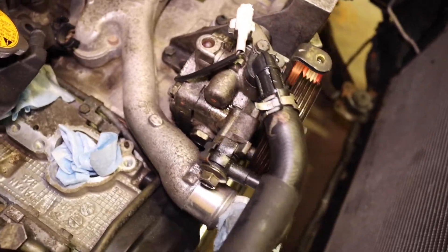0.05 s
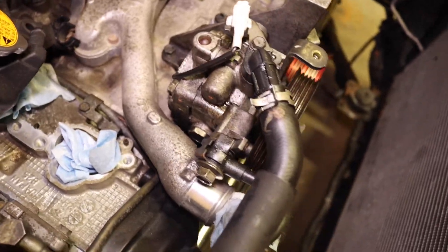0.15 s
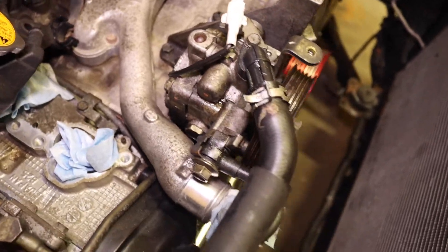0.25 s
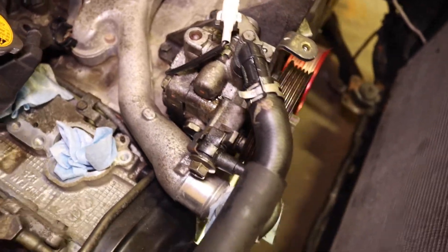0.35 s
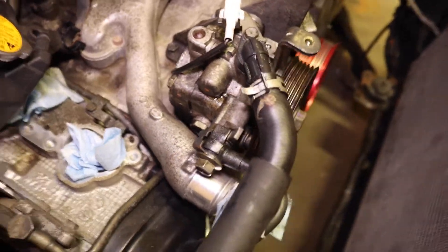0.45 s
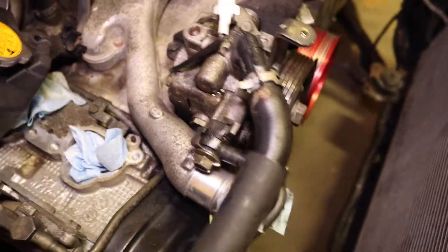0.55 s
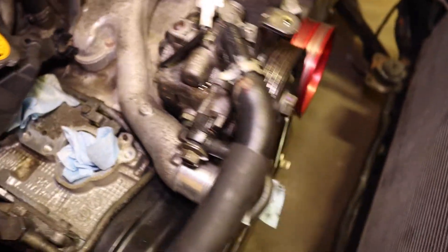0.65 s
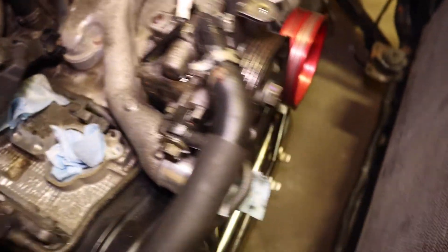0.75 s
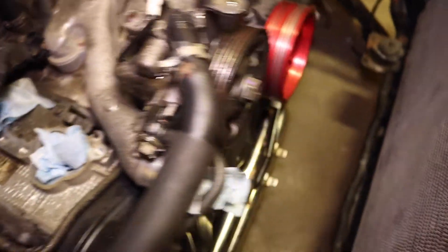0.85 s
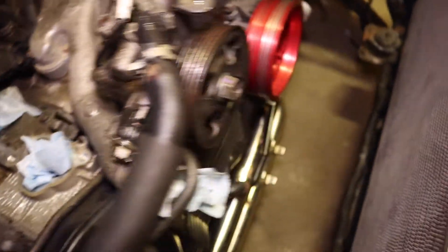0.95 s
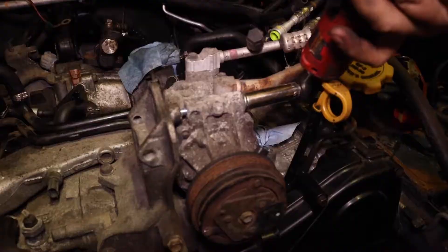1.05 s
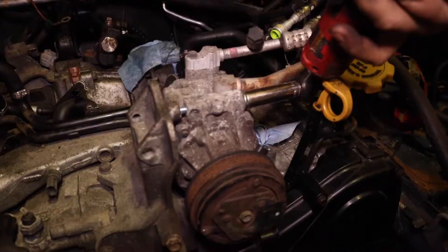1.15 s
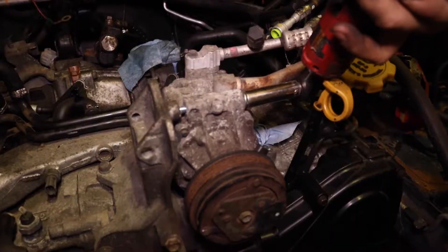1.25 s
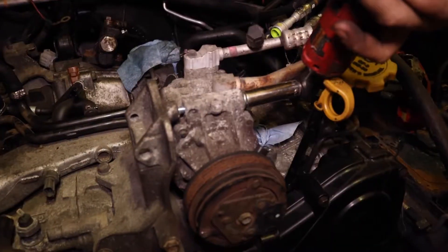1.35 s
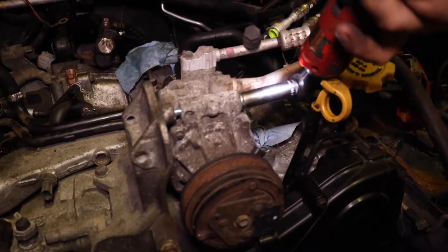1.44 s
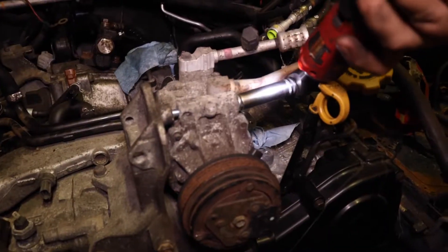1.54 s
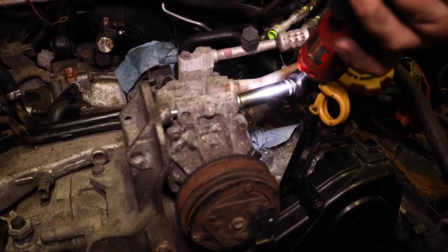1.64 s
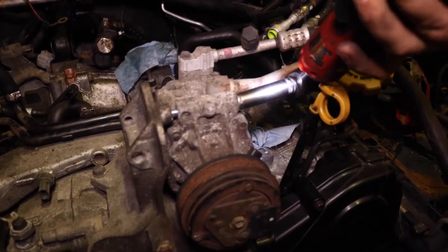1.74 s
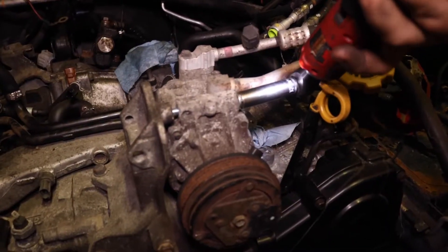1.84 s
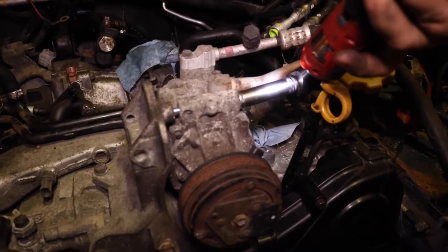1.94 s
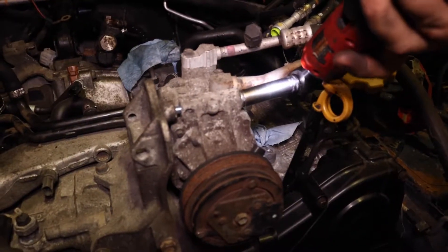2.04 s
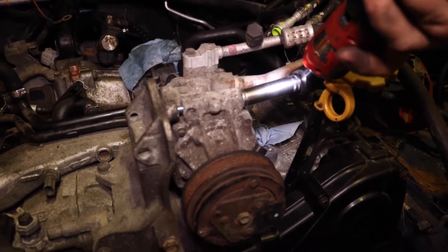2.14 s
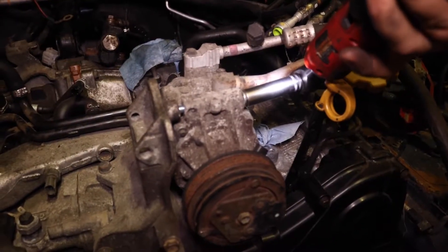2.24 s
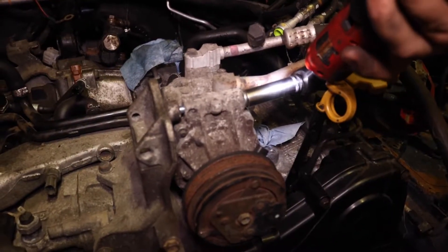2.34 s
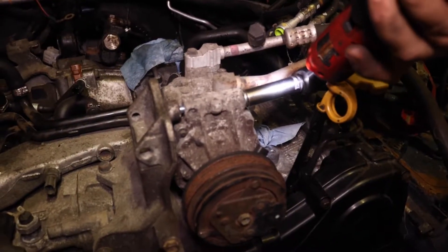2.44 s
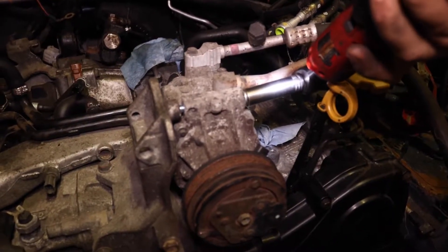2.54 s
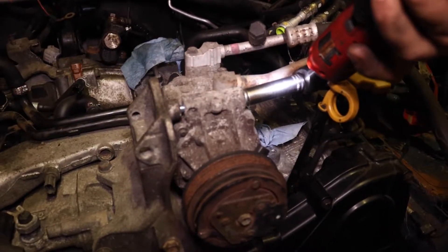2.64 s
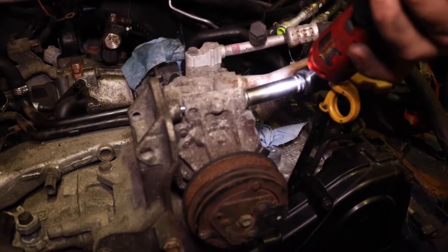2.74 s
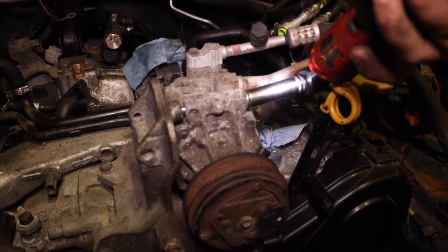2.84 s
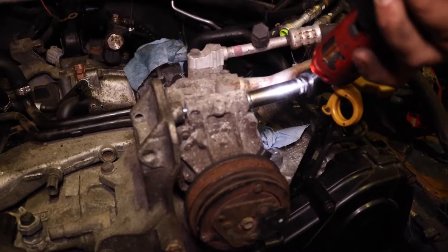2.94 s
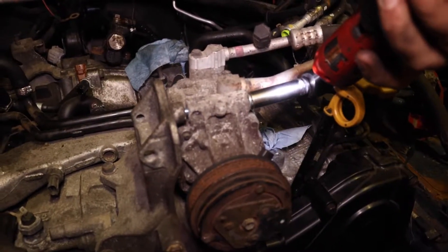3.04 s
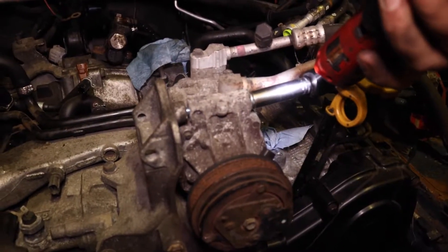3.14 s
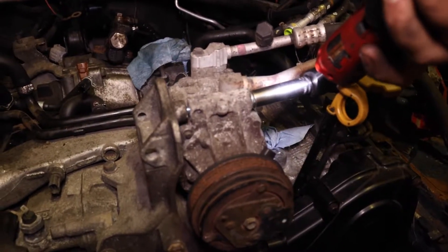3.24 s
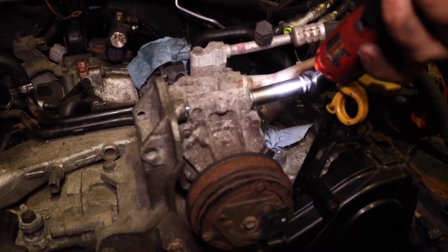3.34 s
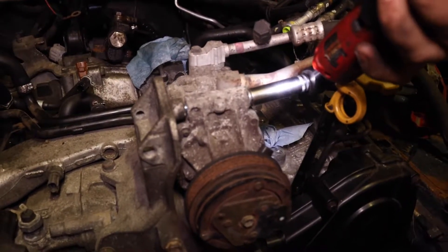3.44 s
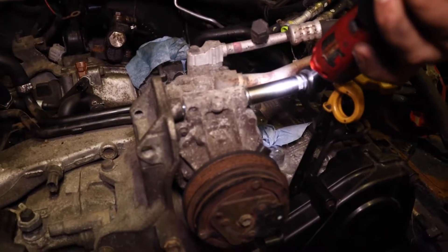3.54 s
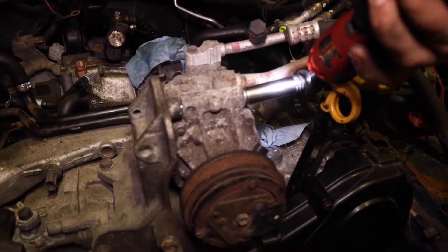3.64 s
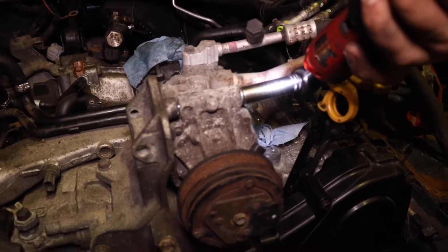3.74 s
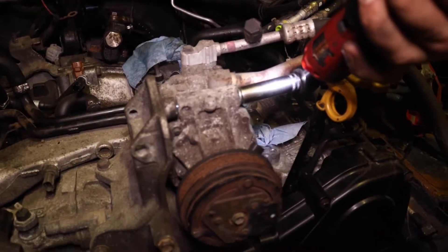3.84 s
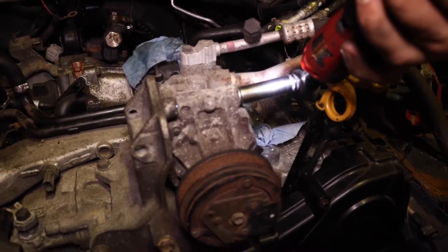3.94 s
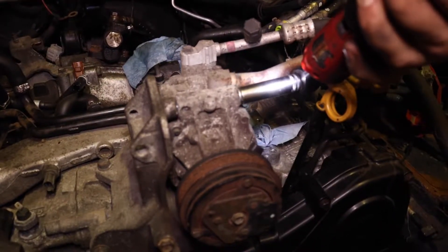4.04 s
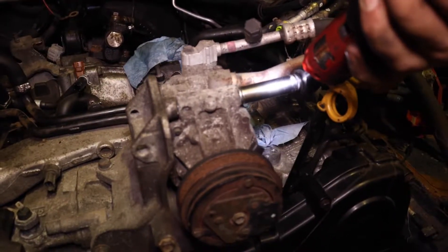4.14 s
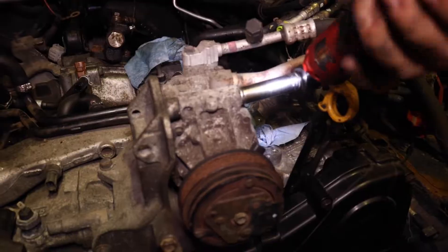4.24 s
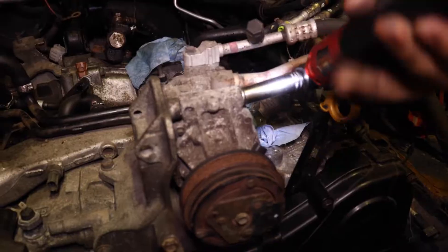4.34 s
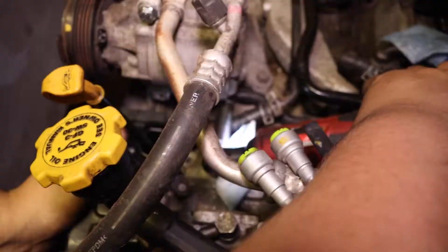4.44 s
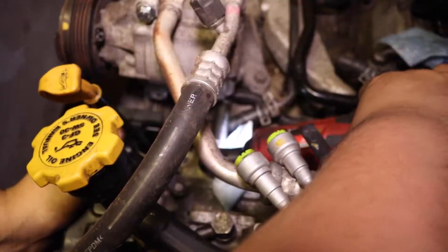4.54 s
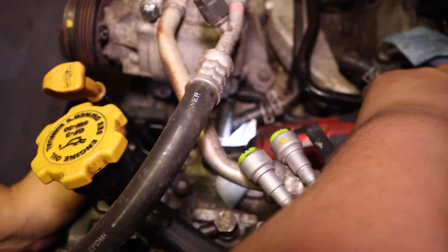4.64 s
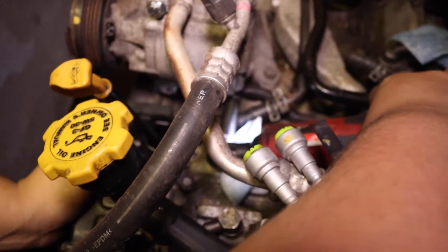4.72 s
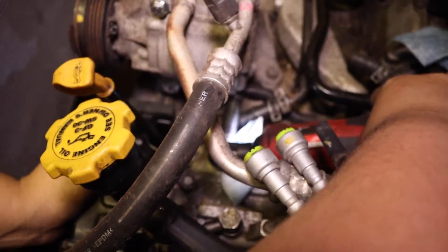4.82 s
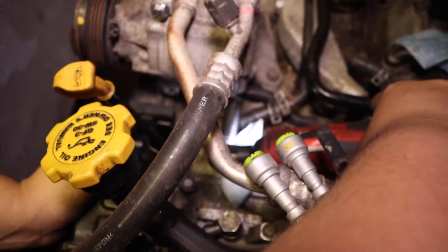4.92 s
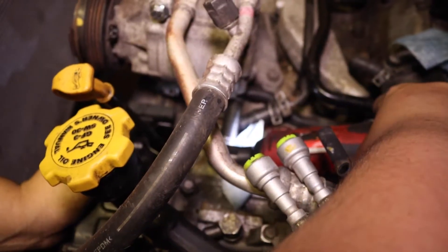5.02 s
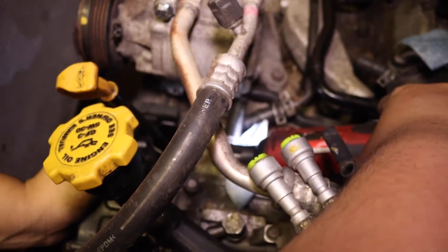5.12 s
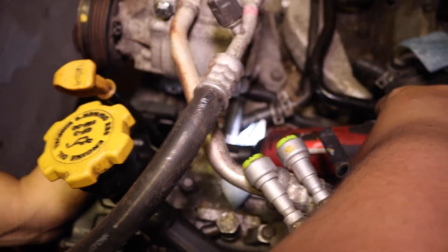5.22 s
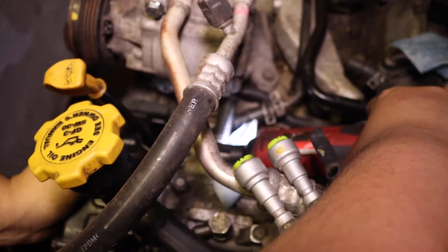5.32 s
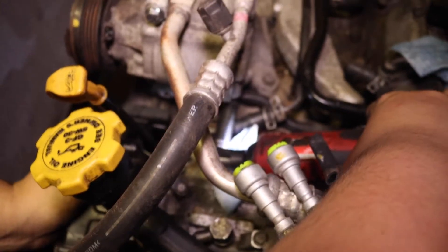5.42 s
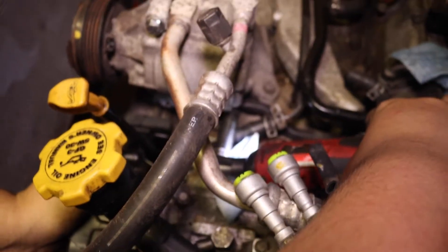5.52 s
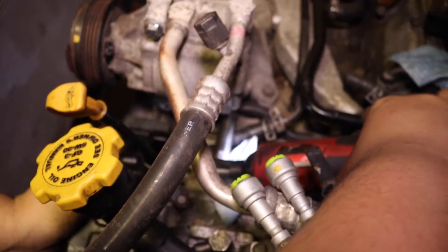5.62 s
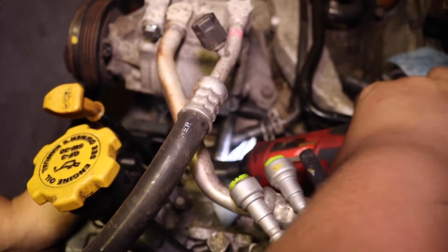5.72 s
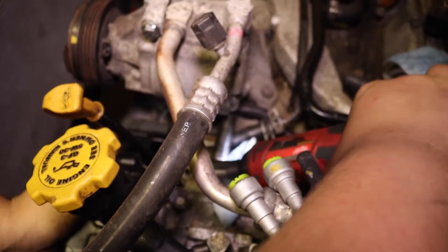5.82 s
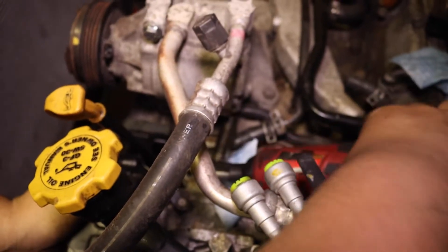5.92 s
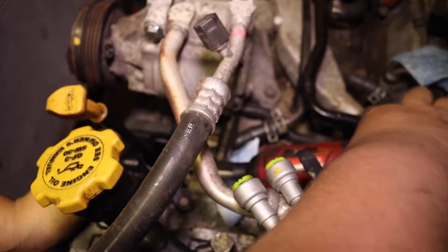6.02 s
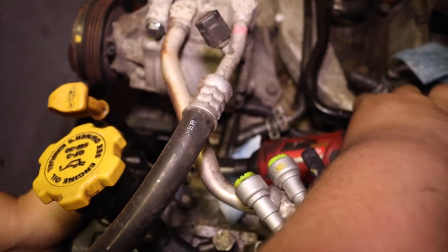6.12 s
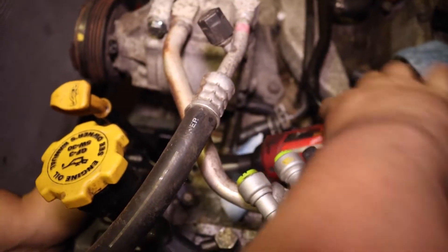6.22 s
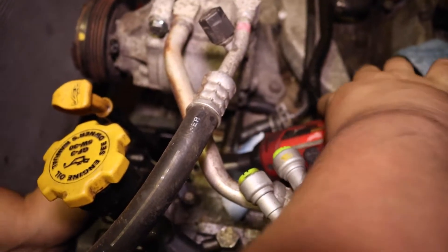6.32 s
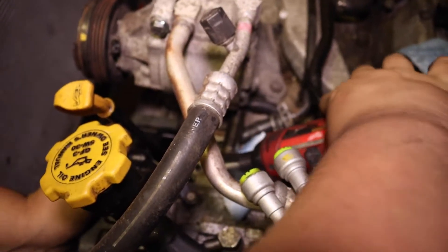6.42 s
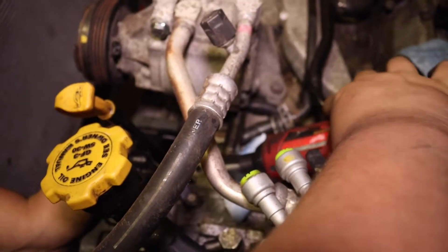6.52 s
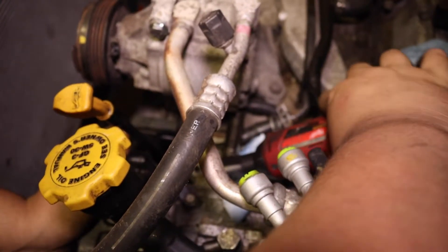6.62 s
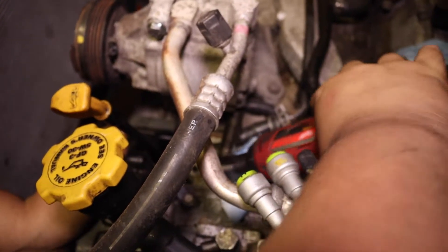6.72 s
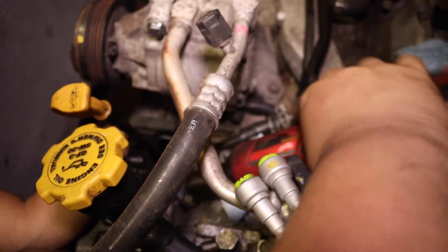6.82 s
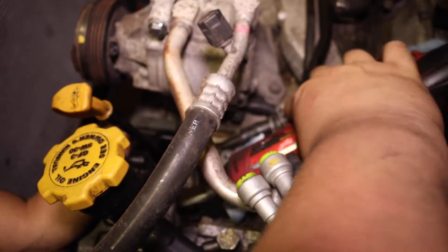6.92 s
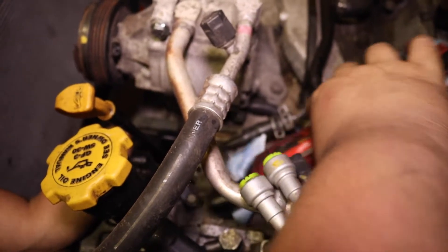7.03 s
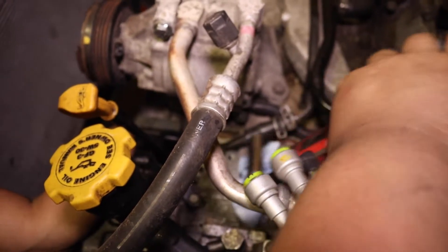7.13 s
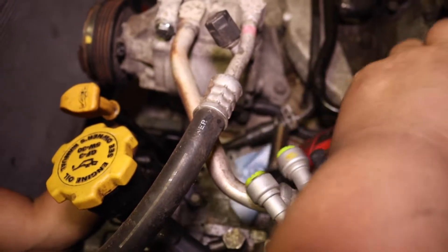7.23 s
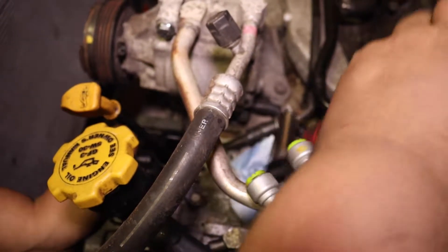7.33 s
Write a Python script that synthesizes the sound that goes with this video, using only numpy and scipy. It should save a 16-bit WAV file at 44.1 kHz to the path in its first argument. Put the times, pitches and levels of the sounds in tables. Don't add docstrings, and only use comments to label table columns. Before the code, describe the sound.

In a garage with low machine hum and faint insects, tools clank on steel across the room, getting harder. The sound cuts closer: a click, tiny ticks, then a cordless ratchet gives a short rattling burst that coasts down, followed at once by a long steady run. From another close position it runs again, stops, and after a quiet pause loose sockets click and snap sharply near the microphone.

```python
import sys
import numpy as np
from scipy import signal
from scipy.io import wavfile
from scipy.ndimage import map_coordinates

SR = 44100
rng = np.random.default_rng(int(sys.argv[2]) if len(sys.argv) > 2 else 0)


def master(y):
    cut = np.clip(np.atleast_2d(y).T, -1, 1)
    pcm = np.round(cut * 32767)
    wavfile.write(sys.argv[1], SR, pcm.astype(np.int16))


def magnitude_from_level(level_db):
    exponent = np.asarray(level_db, float) / 20
    return 10 ** exponent


N = 325035
T = np.arange(N) / SR


def rms_one(x):
    return x / np.sqrt(np.mean(x ** 2) + 1e-20)


def at_hz(points, hz):
    points_hz, level = np.transpose(points)
    return np.interp(np.log(hz), np.log(points_hz), level)


def clicks(times, gains):
    samples = np.round(np.asarray(times) * SR).astype(int)
    return np.bincount(np.minimum(samples, N - 1), gains, N) + 1e-12


def ring(x, hz, t60):
    r, w = magnitude_from_level(-60 / (t60 * SR)), 2 * np.pi * hz / SR
    return signal.lfilter([0, np.sin(w)], [1, -2 * r * np.cos(w), r * r], x)


def decay(x, t60):
    return signal.lfilter([1], [1, -magnitude_from_level(-60 / (t60 * SR))], x)


def high_pass(x, hz, order):
    return signal.sosfilt(signal.butter(order, hz, "high", fs=SR, output="sos"), x)


def band_pass(x, low_hz, high_hz, order):
    return signal.sosfilt(signal.butter(order, [low_hz, high_hz], "band", fs=SR, output="sos"), x)


def drift(rate):
    knots = rng.standard_normal(400)
    return map_coordinates(knots, [T * min(rate, 50)], order=3)


EDGES = 25 * 2 ** np.arange(0, 9.5, 1 / 3)


def bands(spectrum, envelope, size=N, low_hz=20):
    out, white = 0, rng.standard_normal((2, size))
    for k, (low, high) in enumerate(zip(EDGES, EDGES[1:])):
        if low > low_hz:
            hz = np.sqrt(low * high)
            out = out + magnitude_from_level(at_hz(spectrum, hz)) * band_pass(white[k % 2] * envelope(hz), low, high, 2)
    return out


# (from t/s, to t/s)
PLACES = [
    (0, 1.057),
    (1.068, 4.478),
    (4.478, 7.4),
]
AIR_DB = [-39, -36, -41.5]
# (from t/s, attack t/s, held until t/s, recovery t/s, level/dB)
DUCKS = [
    (1.49, 0.11, 1.66, 0.34, -24),
    (1.93, 0.083, 4.476, 0.003, -22),
    (4.68, 0.13, 6.4, .95, -13.5),
]


def gain_control():
    db = sum(level_db * (T >= start) * (T < stop) for (start, stop), level_db in zip(PLACES, AIR_DB))
    for start, attack_s, until, recovery_s, depth_db in DUCKS:
        corners = [start, start + attack_s, until, until + recovery_s]
        db = db + depth_db * np.interp(T, corners, [0, 1, 1, 0])
    return magnitude_from_level(db)


# (f/Hz, level/dB per Hz)
AIR = [
    [(12, -30), (20, -1.5), (158, -1), (254, -10), (524, -8), (819, -1.5), (1390, -17.5), (1600, -23),
     (3400, -37.5), (3800, -27), (5320, -25), (5950, -34.5), (15800, -40)],
    [(12, -39), (20, 3.5), (76, -4), (137, -2.5), (221, -0.5), (554, -7.5), (866, -2), (1950, -33.5),
     (3130, -33.5), (4370, -27), (5950, -44.5), (6650, -39), (15800, -46)],
    [(12, -28), (20, 7), (65, -15.5), (123, -2), (209, -14.5), (554, -10), (754, -10), (866, -6.5),
     (1560, -22), (3400, -30), (5170, -26.5), (5780, -35), (15800, -39.5)],
]


def room_air(place):
    flicker = magnitude_from_level(0.72 * drift(4.5))
    return rms_one(bands(AIR[place], lambda hz: flicker))


# (multiple of 69 Hz, level/dB)
HUM = [(1, -38.5), (2, -30), (3, -31.5), (4, -46.5), (5, -40.5), (6, -48.5), (7, -46), (10, -49.5)]


def hum():
    out = 0
    for k, db in HUM:
        level = magnitude_from_level(db + 0.49 * drift(6.0))
        out = out + level * np.sin(2 * np.pi * k * 69 * T + .2 * drift(18.0))
    return rms_one(out)


# (t/s, level/dB)
INSECTS = [(0, -29), (.12, -37), (.2, -33), (1.2, -32.5), (1.3, -27), (6.2, -27.5), (6.4, -22.5),
           (6.9, -18.5), (7.37, -34)]


def insects():
    trill = rng.standard_normal(N) * magnitude_from_level(3.7 * drift(50))
    song = ring(trill, 5400, 0.015) + magnitude_from_level(-3.0) * ring(trill, 7300, 0.025)
    return magnitude_from_level(np.interp(T, *np.transpose(INSECTS))) * rms_one(song)


# (f/Hz, t60/s)
GARAGE_T60 = [(300, 0.55), (1500, 0.72), (5000, 0.45), (12000, 0.057)]


def garage(x):
    s, out = T[:SR], 0

    def fade(hz):
        return magnitude_from_level(-60 * s / at_hz(GARAGE_T60, hz)) * (s > .004)

    shares = np.array([drift(14) for _ in range(3)])
    for share in shares / np.linalg.norm(shares, axis=0):
        tail = bands([(100, 0.0069), (16000, 0.0059)], fade, size=SR, low_hz=150)
        out = out + share * signal.oaconvolve(x, tail / np.linalg.norm(tail))[:N]
    return out


# (t/s, peak level/dB, bright part level/dB, struck region f/Hz)
CLANKS = [
    (0.074, -60.5, -53.5, 3500),
    (0.1186, -29, -81, 3900),
    (0.1885, -20.5, -47.5, 3000),
    (0.316, -19, -59.5, 3430),
    (0.3359, -11, -50.5, 3800),
    (0.597, -14, -54, 3800),
    (0.897, -6.5, -47, 3300),
]
# (f/Hz, t60/s, level/dB)
CLANK_MODES = [(2070, 0.0018, 7.5), (2900, 0.011, -5.5), (3360, 0.0066, -3), (3900, 0.0098, -4),
               (4600, 0.004, -11), (5490, 0.0056, 2), (6350, 0.01, -5.5)]
# (f/Hz, t60/s, level/dB)
CLANK_BRIGHT = [(9150, 0.0055, -15.5), (10030, 0.0079, -6), (9900, 0.0033, -9)]


def clanks():
    s, db, bright_db, struck_hz = np.transpose(CLANKS)
    out = 0
    for modes, level_db, t60 in ((CLANK_MODES, db - 34.5, .12), (CLANK_BRIGHT, bright_db - 5.0, .3)):
        for hz, ring_t60, mode_db in modes:
            far_db = 10.5 * abs(np.log2(hz / struck_hz)) * (hz < 8000)
            hits = clicks(s, magnitude_from_level(level_db + mode_db - far_db))
            out = out + ring(rng.standard_normal(N) * decay(hits, t60), hz, ring_t60)
    burst = rng.standard_normal(N) * decay(clicks(s, magnitude_from_level(db - 27)), 0.054)
    out = out + band_pass(burst, 1500, 9000, 2)
    return out + magnitude_from_level(-3.5) * garage(out)


# (t/s, f/Hz, level/dB, t60/s)
PINGS = [(4.437, 2300, -31, 0.084), (5.736, 14000, -23, .008), (5.759, 13130, -21.5, .008),
         (5.866, 12800, -19, 0.012), (6.036, 10600, -49, 0.049), (7.002, 840, -26.5, 0.13),
         (7.001, 1770, -21, 0.055), (7.002, 7400, -18.5, 0.014), (5.875, 2070, -13.5, 0.012),
         (7.1574, 3580, -5.5, 0.012), (0.598, 3950, -39, .08), (0.898, 5650, -38, .06),
         (7.218, 3200, -15.5, 0.017), (7.2554, 3100, -16, .022), (7.318, 3000, -21, .025)]


def pings():
    out = 0
    for s, hz, db, t60 in PINGS:
        struck = ring(clicks([s], magnitude_from_level([db - 13.5])), hz, t60)
        out = out + ring(struck, hz, 0.0019)
    return out


# (t/s, peak level/dB, ring
# f/Hz, top level/dB, bottom level/dB)
CLICKS = [(1.07, -29.5, 2000, -2.5, 1), (1.261, -24, 2400, -7.5, -9), (4.541, -22, 2560, -25, -3),
          (4.553, -22, 2960, -3, -14), (4.6326, -35, 3400, -23.5, 10.5), (5.7815, -20, 2800, 16, -22),
          (5.8542, -24, 4000, 18.5, -30), (6.339, -38.5, 3620, 4, -15), (6.8371, -19, 4040, -13.5, -33),
          (6.872, -21, 3180, -1.5, -21), (7.0, -2.5, 3020, -5, -6.5), (7.0804, -10.5, 3770, -7, -28),
          (7.1568, -3.5, 3930, -4, -39), (7.219, -11, 3260, -11, -11.5), (7.2523, -10, 3480, 1, -37),
          (7.308, -24, 2840, -5.5, -17), (7.316, -10.5, 3300, -2, -5.5)]
# (t/s, peak level/dB, ring f/Hz)
TOUCHES = [(1.1951, -28.5, 3160), (1.380, -29.5, 2970), (6.2569, -42, 3648), (6.3636, -47, 3300),
           (6.501, -63, 3070), (6.5438, -32, 3196), (6.608, -44, 2750), (6.6943, -40, 2720),
           (6.9447, -29.5, 2780), (7.1885, -20.5, 2900)]
# (t/s, peak level/dB, ring f/Hz)
RATTLES = [(6.7962, -25, 4000), (6.8031, -14, 3360), (6.8445, -13.5, 3000), (6.85, -16, 2290),
           (7.0876, -6, 3600), (7.2557, -6, 3300), (7.275, -26, 3680), (7.3207, -9.5, 3060),
           (7.34, -18.5, 4493)]


def handling():
    out, s = np.zeros(N + 3000), T[:3000]
    # t60 s, broad dB
    rows = [row + (.02, -5.0) for row in CLICKS]
    rows += [row + (-8, -12.5, .02, -9) for row in TOUCHES]
    rows += [row + (-26, -18, .011, -9) for row in RATTLES]
    noises = rng.standard_normal((len(rows), 3000))
    for (start, db, hz, top_db, bottom_db, t60, broad_db), noise in zip(rows, noises):
        scuff = noise * (magnitude_from_level(-60 * s / t60) + magnitude_from_level(-18.0 - 60 * s / 0.15))
        sound = magnitude_from_level(-32.5) * ring(ring(scuff, hz, 0.0024), hz, 0.0024)
        sound += magnitude_from_level(broad_db) * band_pass(scuff, 1000, 7000, 3)
        sound += magnitude_from_level(top_db - 10.0) * band_pass(scuff, 5500, 15500, 2)
        sound += magnitude_from_level(bottom_db - 17.0) * ring(scuff, 1000, 0.009)
        sound += magnitude_from_level(bottom_db - 36.5) * ring(scuff, 600, 0.016)
        i = round(start * SR)
        out[i:i + 3000] += magnitude_from_level(db) * sound
    return out[:N]


def lens():
    at = 1.093 + .0612 * np.arange(6)
    ticks, echo_s = 0, .00037
    for k, sign in enumerate([1, -1, 1, -1]):
        ticks = ticks + sign * clicks(at + k * echo_s, magnitude_from_level(-27 - 1.9 * k) * np.ones(6))
    return signal.lfilter([.25, .5, .25], [1], ticks)


# (from t/s, to t/s, level/dB, second harmonic level/dB)
WHINE = [
    (1.449, 1.468, -60, 25),
    (1.87, 1.895, -58, 0),
    (4.602, 4.624, -40, 0),
    (4.624, 4.652, -38, 0),
]
# (multiple of 1862 Hz, level/dB)
WHINE_ORDERS = [(1, -5), (2, -8), (3, 0), (4, -18), (5, -19), (6, -26), (7, -22)]


def whine():
    level, even_db = 0, 0
    for a, b, db, second_db in WHINE:
        during = (T > a) * (T < b)
        level = level + magnitude_from_level(db) * np.interp(T, [a, a + 0.0021, b - .006, b], [0.34, 1, 1.0, 0.3]) * during
        even_db = even_db + second_db * during
    tones = sum(magnitude_from_level(db + even_db * (k == 2)) * np.sin(2 * np.pi * k * 1862 * T) for k, db in WHINE_ORDERS)
    return level * tones


# (t/s, strokes made so far)
STROKES = [
    [(1.4656, 0), (1.4874, 2), (1.516, 4), (1.5354, 5), (1.5674, 7), (1.6104, 10), (1.6514, 13),
     (1.6664, 14)],
    [(1.8951, 0), (1.9138, 1), (1.9445, 3), (1.993, 5.9), (2.102, 13.43), (2.321, 29.33), (2.539, 44.89),
     (2.757, 60.42), (2.976, 76.36), (3.085, 84.14), (3.194, 91.74), (3.303, 99.56), (3.522, 115.6),
     (3.74, 131.31), (3.958, 147.36), (4.068, 155.33), (4.177, 163.16), (4.3159, 173)],
    [(4.646, 0), (4.6709, 2), (4.6913, 3), (4.721, 5), (4.751, 7.06), (4.893, 17.96), (4.964, 23.3),
     (5.106, 34.45), (5.249, 45.32), (5.32, 50.95), (5.462, 61.89), (5.675, 78.11), (5.705, 80)],
]
# (time constant t/s, strokes of momentum left, strokes made)
COAST = [(.125, 8.93, 6), (.125, 8.5, 5), (.09, 6, 4)]
# (t/s, share of a 13.8 ms stroke)
SLIP = [
    [(1.46, 0), (1.7, 0)],
    [(1.92, .03), (1.96, .1), (2.1, .07), (2.25, 0), (2.4, -.06), (2.58, -.06), (2.66, .02), (2.85, .02),
     (3.05, .05), (3.15, .01), (3.3, .05), (3.45, 0), (3.62, -.11), (3.75, 0), (3.9, .12), (4.05, .02),
     (4.2, -.03), (4.3, .02)],
    [(4.72, -.03), (4.83, .07), (4.95, -.03), (5.05, -.03), (5.1, .02), (5.3, .05), (5.45, .02),
     (5.6, -.03), (5.7, -.03)],
]


def stroke_times(run):
    s, made = np.transpose(STROKES[run])
    lag_s, left, count = COAST[run]
    driven = np.interp(np.arange(made[-1] + 1), made, s)
    driven = driven + .0138 * np.interp(driven, *np.transpose(SLIP[run]))
    coasting = s[-1] - lag_s * np.log(1 - np.arange(1, count + 1) / left)
    return np.r_[driven, coasting]


KNOCK_PAWL_DB = [9.5, 3.5, -8.5]
PAWL_FADE_DB_PER_S = [900, 2500, 250]
# (delay t/s, level/dB)
REBOUNDS = [
    (.0028, -6.5),
    (.0055, -15),
]


def contacts(run, pawl, at, blow_db, last_turn):
    gap, count = np.diff(at), len(at) - 1
    when, hit_db = [at - .0008 + rng.normal(0, .0002, len(at))], [blow_db]
    knock_tick_db = blow_db[:-1] + KNOCK_PAWL_DB[run] + 2.5 * rng.standard_normal(count)
    ticks = clicks(at[:-1] + 0.00018, magnitude_from_level(knock_tick_db))
    engaged_db = blow_db[:-1] - 40 * ((gap > .033) | (at[1:] > last_turn))
    fade_db = PAWL_FADE_DB_PER_S[run] * np.maximum(gap - .015, 0)
    for share, ring_db, head_db in pawl:
        when.append(at[:-1] + gap * (share + 0.029 * rng.standard_normal(count)))
        hit_db.append(engaged_db + head_db)
        seat_db = 2.2 * rng.standard_normal(count) + 1.5 * np.interp(at[:-1], T, drift(3.0))
        ticks = ticks + clicks(when[-1], magnitude_from_level(engaged_db + ring_db + seat_db - fade_db))
    slow = np.diff(at, prepend=at[0]) > .0165
    for delay_s, rebound_db in REBOUNDS:
        when.append(at[slow] + delay_s)
        hit_db.append(blow_db[slow] + rebound_db)
    heavy = np.r_[slow, np.zeros(len(pawl) * count), np.ones(len(REBOUNDS) * slow.sum())]
    return np.concatenate(when), np.concatenate(hit_db), heavy, ticks


SLOW_DULL_DB_PER_OCTAVE = [3, -1, 5.5]


def head_noise(run, head, when, hit_db, heavy, rasp_db):
    grains = magnitude_from_level(4.0 * np.minimum(rng.exponential(1, N), 4)) * (rng.random(N) < 6000 / SR)
    teeth = magnitude_from_level(rasp_db) * rms_one(grains)

    def contact(hz):
        dull_db = heavy * SLOW_DULL_DB_PER_OCTAVE[run] * max(np.log2(hz / 4000), 0)
        blows = clicks(when, magnitude_from_level(hit_db - dull_db + 1.6 * rng.standard_normal(len(when))))
        fall, rise = .004 + 18 / hz, .0015 + 5 / hz
        onset = fall * rise / (fall + rise)
        return magnitude_from_level(25) * (decay(blows, fall) - decay(blows, onset)) + teeth

    return magnitude_from_level(2.0) * bands(head, contact, low_hz=995)


SOCKET_WOBBLE = [.02, .025, .006]


def socket_ring(run, socket, when, hit_db):
    out = 0
    for turn, (hz, t60, db) in enumerate(socket):
        struck = clicks(when, magnitude_from_level(hit_db + 2.0 * rng.standard_normal(len(when))))
        tilt = np.clip(np.round(drift(9)), -1, 1)
        modes = 0
        for k in (-1, 0, 1):
            modes = modes + ring(struck * (tilt == k) + 1e-12, hz * (1 + SOCKET_WOBBLE[run] * k), t60)
        out = out + (-1) ** turn * magnitude_from_level(db - 13.5) * ring(modes, hz, .003)
    return out


PAWL_HZ = [12600, 12300, 12300]


def pawl_ring(run, ticks):
    out, seating = 0, rng.integers(0, 3, N)
    for k, tune in enumerate([.9, 1, 1.05]):
        hz = PAWL_HZ[run] * tune
        out = out + magnitude_from_level(-11) * ring(ring(ticks * (seating == k) + 1e-12, hz, .002), hz, .001)
    return out


# (rocks per s, depth level/dB, firmest grip t/s)
ROCKING = [(2.27, 0, 1.6), (2.27, 1.5, 2.61), (7.25, 2.5, 5.178)]
# (from t/s, to t/s, level/dB)
LEANS = [
    (1.459, 1.58, 2.5),
    (1.913, 2.019, 12),
    (3.66, 3.948, 10),
    (4.115, 4.44, 5.5),
    (4.63, 4.74, 7.5),
    (5.652, 5.95, 19),
]
LOW_BOOM_DB = [-16.5, -17.5, -19]
HOUSING_WANDER_S = [.0002, .00018, .0004]


def housing_boom(run, housing, at, boom_db):
    shake = magnitude_from_level(-33 + np.interp(T, at, boom_db)) * rng.standard_normal(N) * (T > at[0]) * (T < at[-1])
    rate, depth_db, firm_s = ROCKING[run]
    hand_db = depth_db * np.cos(2 * np.pi * rate * (at - firm_s))
    low_db = LOW_BOOM_DB[run]
    for a, b, db in LEANS:
        low_db = low_db + db * np.interp(T, [a, a + 0.048, b - .06, b], [0, 1, 1, 0])
    body, late = 0, at + .0011 + HOUSING_WANDER_S[run] * np.interp(at, T, drift(11))
    for hz, t60, db in housing:
        chance_db = 1.5 * rng.standard_normal(len(at)) + 1.5 * np.interp(at, T, drift(12))
        push = clicks(late, magnitude_from_level(boom_db + hand_db + chance_db)) + shake
        mode = ring(push * magnitude_from_level((low_db + 6.0 * drift(4.88)) * (hz < 600)), hz, t60)
        body = body + magnitude_from_level(db + 7.0) * high_pass(mode, 0.5 * hz, order=2)
    if run == 2:
        body = body + magnitude_from_level(14) * ring(push * (T > STROKES[run][-2][0] - .03), 895, 0.05)
    return body


# (t/s, knock level/dB, gear rasp level/dB, grip on the housing level/dB)
LOAD = [
    [(1.45, -40, -54.5, -45), (1.465, -26, -27, -43), (1.477, -11, -33, -23.5), (1.501, -9.5, -14, -17.5),
     (1.517, -6.5, -3.5, -20), (1.549, -11, -3.5, -21), (1.58, -10.5, -8.5, -21.5), (1.606, -11.5, -9, -24),
     (1.63, -14.5, -6.5, -25.5), (1.74, -19.5, -19, -28), (1.803, -17.5, -24.5, -28.5),
     (1.892, -24.5, -33.5, -32)],
    [(1.895, -18, -22, -37.5), (1.914, -9.5, -26.5, -22.5), (1.945, -9, -4.5, -15), (2.0, -11, -1.5, -23),
     (2.15, -14.5, -7, -29), (2.4, -18.5, -8, -25), (2.62, -18, -8.5, -28.5), (2.72, -17, -13.5, -33),
     (2.78, -19, -10, -27), (2.95, -19.5, -9.5, -28.5), (3.07, -17, -10, -30.5), (3.3, -16.5, -11.5, -30.5),
     (3.5, -19.5, -8.5, -32), (3.9, -18.5, -11.5, -34), (4.24, -17, -10.5, -32.5),
     (4.33, -17.5, -14.5, -38), (4.45, -25.5, -51.5, -45)],
    [(4.625, -38, -19.5, -34.5), (4.657, -13, -16, -27.5), (4.672, -6, -11.5, -14.5), (4.696, -14, -3, -26),
     (4.765, -13, -6.5, -25.5), (4.9, -17.5, -11, -33), (5.04, -18.5, -6.5, -30),
     (5.18, -18.5, -9.5, -29.5), (5.33, -19, -15.5, -32.5), (5.45, -19.5, -5.5, -30),
     (5.68, -17, -15, -32.5), (5.8, -10.5, -28, -32.5), (5.83, -29, -54.5, -10)],
]
# (t/s, knock level/dB, housing level/dB)
SETTLE = [
    [(1.8323, -23, -33)],
    [(4.455, -32, -69), (4.4754, -50, -62)],
    [(5.8536, -25.5, -66), (5.8742, -13.5, -34.5)],
]


def ratchet(run, head, housing, socket, pawl):
    s, knock_db, rasp_db, grip_db = np.transpose(LOAD[run])
    turning = stroke_times(run)
    rest_s, rest_db, rest_grip_db = np.transpose(SETTLE[run])
    backlash_db = .9 * rng.standard_normal(len(turning)) + 1.2 * np.interp(turning, T, drift(5.0))
    at = np.r_[turning, rest_s]
    blow_db = np.r_[np.interp(turning, s, knock_db) + backlash_db, rest_db]
    boom_db = np.r_[np.interp(turning, s, grip_db), rest_grip_db]
    when, hit_db, heavy, ticks = contacts(run, pawl, at, blow_db, turning[-1])
    steel = head_noise(run, head, when, hit_db, heavy, np.interp(T, s, rasp_db, -99, -99))
    steel = steel + socket_ring(run, socket, when, hit_db) + pawl_ring(run, ticks)
    return high_pass(steel, 780, order=4) + housing_boom(run, housing, at, boom_db)


# (f/Hz, level/dB per Hz)
HEAD_B = [(1150, -16), (1500, -15), (2070, -7), (2520, -10.5), (2860, -6), (3650, -4.5), (4090, -3.5),
          (5040, -9.5), (5990, -9.5), (8180, -12.5), (12100, -7), (15800, -18)]
HEAD_C = [(590, -14), (1000, -22.5), (1370, -11.5), (1520, -9.5), (2140, -8.5), (2730, -6), (3000, -8),
          (3820, 0), (4650, -6), (5340, -4), (8670, -9), (13400, -4.5), (15800, -20)]
# (f/Hz, t60/s, level/dB)
HOUSING_B = [(855.3, 0.061, 4), (833, 0.03, -5), (657, 0.051, -14.5), (731, 0.022, -19), (951, 0.032, 3.5),
             (1082, 0.022, 1.5), (1270, 0.024, 0), (470, 0.017, 13.5), (362.5, 0.012, 1.5)]
HOUSING_C = [(779, 0.019, 10), (873, 0.037, 0), (723, 0.099, -6.5), (1150, 0.0092, -29.5),
             (440, 0.013, 12.5), (318, 0.01, 2.5)]
# (f/Hz, t60/s, level/dB)
SOCKET_A = [(1520, 0.037, -9), (1992, 0.015, -0.5), (2164, 0.013, -3), (2830, 0.011, 1),
            (3500, 0.0094, -2.5), (5040, 0.01, -4.5)]
SOCKET_B = [(1517, 0.014, -7.5), (1870, 0.012, 1.5), (2000, 0.016, 0.5), (2203, 0.014, 1),
            (2310, 0.013, -9.5), (2915, 0.01, -2), (3130, 0.0097, -4), (3320, 0.0095, -4),
            (3600, 0.007, -8), (4900, 0.008, -7), (5100, 0.011, -2.5)]
SOCKET_C = [(2800, 0.019, -1), (3660, 0.0074, 1.5), (4320, .008, -4.5), (5130, 0.018, -2.5),
            (6900, 0.02, -14), (8300, 0.014, -10.5)]
# (share of stroke, ring level/dB, head level/dB)
PAWL_B = [(0.071, -35, -9.5), (0.449, -31, -7.5), (0.682, 19.5, -7)]
PAWL_C = [(0.089, -23, -17.5), (0.222, -26.5, -48), (0.402, -7.5, -7.5), (0.641, -15, -8),
          (0.848, -12, -19)]


def three_runs():
    first = ratchet(0, HEAD_B, HOUSING_B, SOCKET_A, PAWL_B)
    second = ratchet(1, HEAD_B, HOUSING_B, SOCKET_B, PAWL_B)
    third = ratchet(2, HEAD_C, HOUSING_C, SOCKET_C, PAWL_C)
    return first + second + third


# (t/s, f/Hz, level/dB)
FAR_MOTOR = [
    [(4.72, 202.5, -64), (4.76, 209, -40), (4.87, 219, -47), (4.93, 202, -47), (4.99, 158, -46)],
    [(5.41, 140.4, -45), (5.46, 173, -41), (5.52, 198, -56), (5.57, 223, -63)],
    [(4.95, 352, -48), (5.0, 314, -40), (5.05, 321, -45), (5.09, 335, -53)],
    [(5.24, 283, -55), (5.3, 277.4, -43), (5.4, 323, -41), (5.43, 335, -57)],
]


def far_motor():
    out = 0
    for s, hz, db in map(np.transpose, FAR_MOTOR):
        phase = 2 * np.pi * np.cumsum(np.interp(T, s, hz)) / SR
        out = out + magnitude_from_level(np.interp(T, s, db, -99, -99)) * np.sin(phase)
    return out


# (t/s, peak level/dB, ring f/Hz)
SNAPS = [(6.8371, -14.5, 5030), (6.8386, -15.5, 3597), (6.8444, -18, 3020), (6.848, -28, 2200),
         (6.8617, -24.5, 3500), (6.872, -19.5, 3019), (7.0796, -2.5, 4020), (7.0875, -8, 3500),
         (7.092, -17, 3190), (7.1013, -14, 2800), (7.1091, -16, 3020), (7.1308, -23, 4200)]


def snaps():
    s, db, _ = np.transpose(SNAPS)
    hits = clicks(s, magnitude_from_level(db))
    scrape = magnitude_from_level(-11.0) * rng.standard_normal(N) * decay(hits, 0.03)
    rings = sum(ring(clicks([a], magnitude_from_level([d])), hz, .003) for a, d, hz in SNAPS)
    return band_pass(rings + magnitude_from_level(-6.0) * hits + scrape, 1200, 7000, 3)


def scene():
    gain = gain_control()
    near = magnitude_from_level(-7.5) * three_runs() + whine()
    hands = high_pass(handling(), 340, order=2) + snaps()
    ping = pings()
    out, outside = np.zeros(N), insects()
    extras = [clanks(), magnitude_from_level(1.0) * gain * hum() + lens(), far_motor()]
    room_dbs = [-20, -13, -14]
    for place, (start, stop) in enumerate(PLACES):
        here = (T >= start) & (T < stop)
        background = gain * (room_air(place) + outside)
        echo = magnitude_from_level(room_dbs[place]) * garage((near + magnitude_from_level(-5) * hands) * here)
        out += here * (near + hands + ping + echo + extras[place] + background)
    return out[None]


def roll_off(x):
    return signal.sosfilt(signal.butter(12, 15950, fs=SR, output="sos"), x)


def record(dry):
    mix = np.clip(dry, -1, 1)
    return roll_off(mix)


dry = scene()
out = record(dry)
master(out)
```